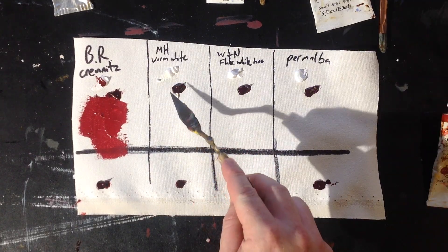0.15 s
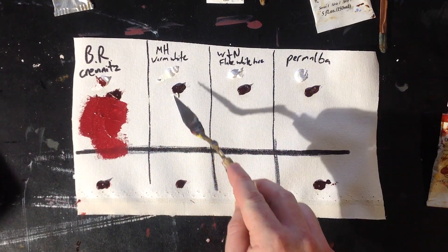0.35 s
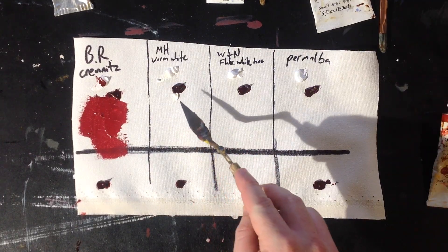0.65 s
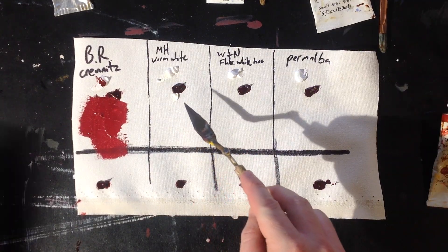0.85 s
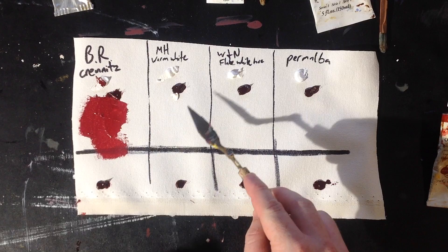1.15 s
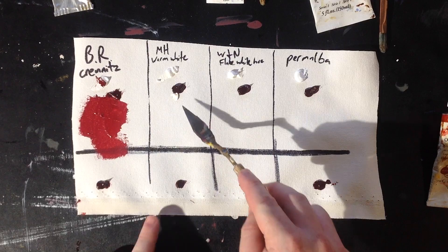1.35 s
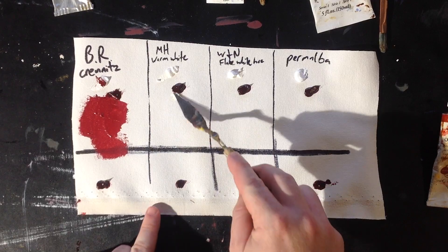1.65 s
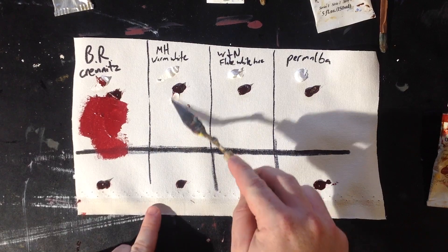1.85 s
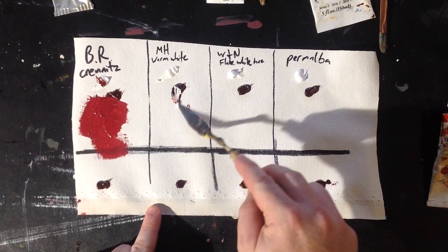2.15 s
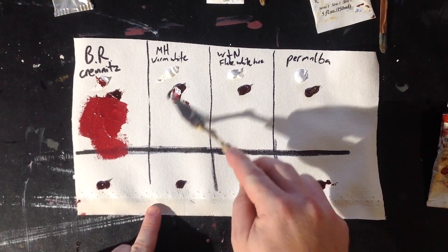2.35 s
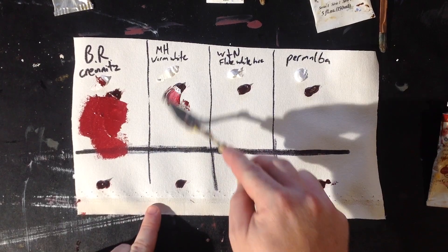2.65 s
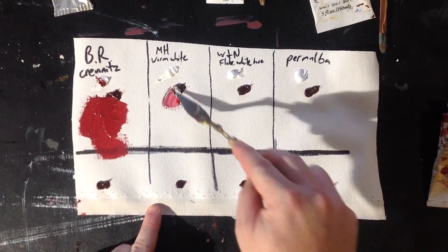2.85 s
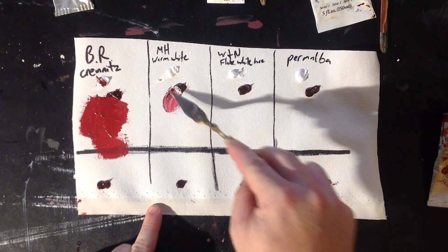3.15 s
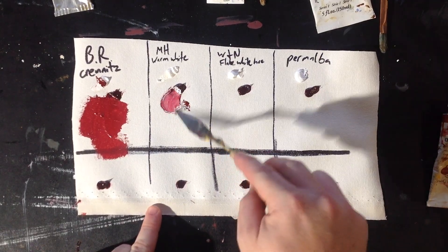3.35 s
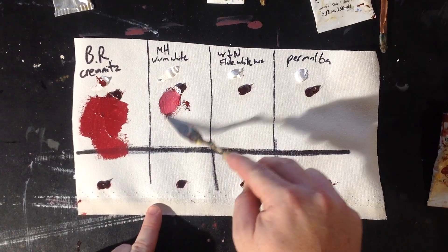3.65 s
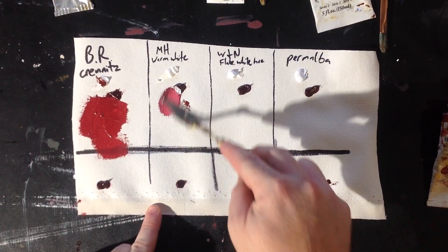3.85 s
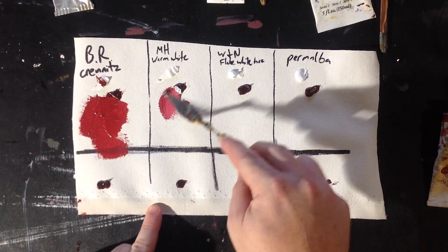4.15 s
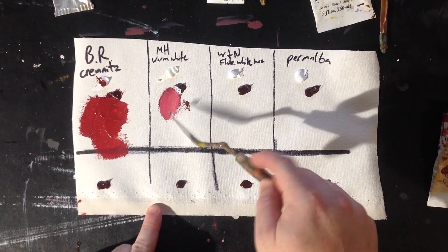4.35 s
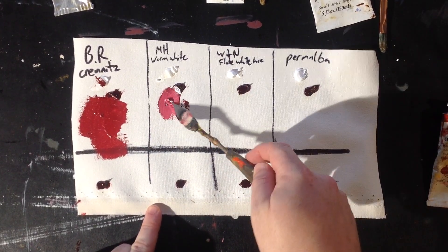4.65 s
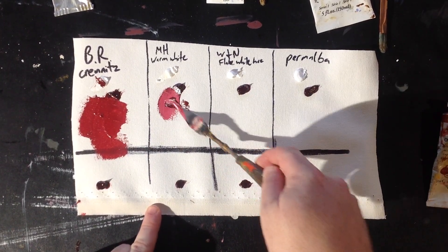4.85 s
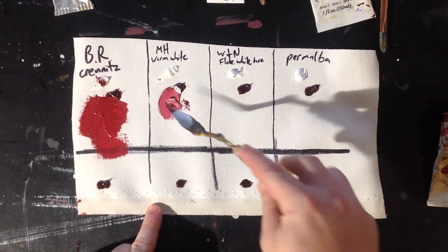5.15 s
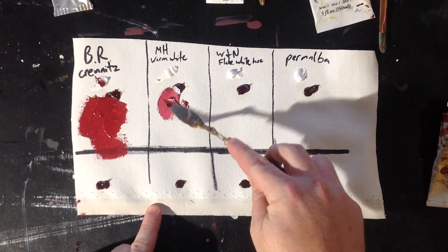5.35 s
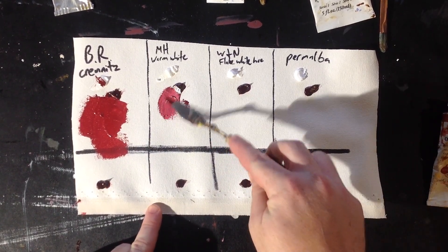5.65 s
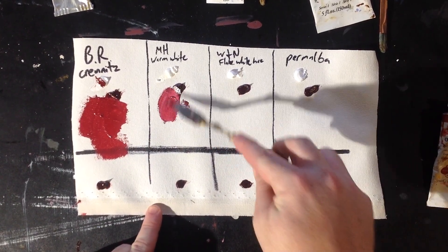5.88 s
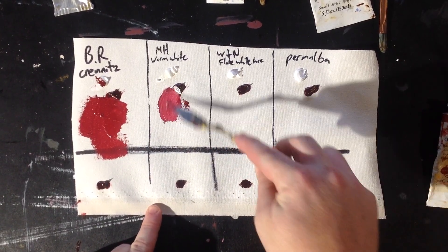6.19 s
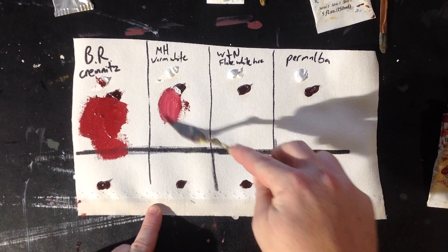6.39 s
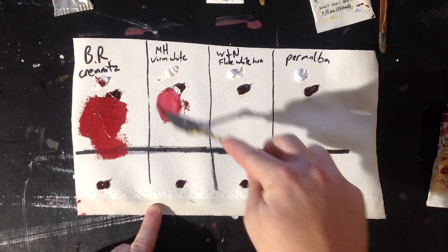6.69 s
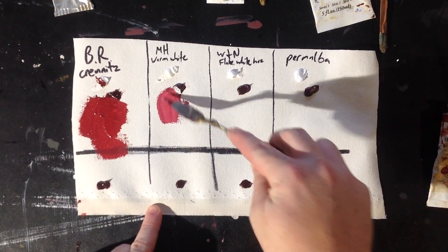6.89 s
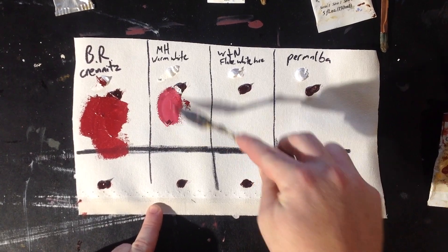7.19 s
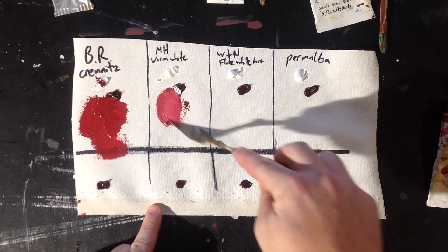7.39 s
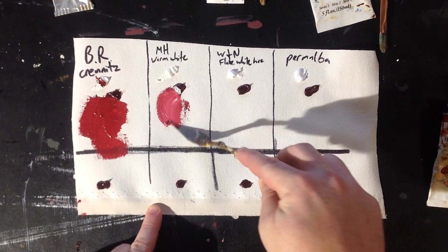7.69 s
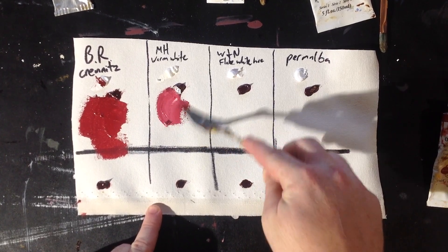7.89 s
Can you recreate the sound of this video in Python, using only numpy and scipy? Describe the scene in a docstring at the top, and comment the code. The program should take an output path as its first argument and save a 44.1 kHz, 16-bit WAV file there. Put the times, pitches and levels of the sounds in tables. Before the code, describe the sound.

Quick dry scrapes and springy clicks of a thin metal blade spreading paint on a sheet, with a low distant motor drone behind.

```python
"""In a small room, a palette knife mixes oil paint on a sheet of canvas paper that lies on a table.
Strokes come in runs of about three a second: random clicks, shaped by resonances, rasp as the blade bears down,
then hiss as its edge cuts through the paint; a small flick follows. Short bursts of bounces make separate ticks.
Soft rubs of the sheet and, near the start, faint gliding squeaks (sine tones) join in.
Behind it are a wavering machine hum, a far motor and a drone that drift in pitch, and low and airy noise."""
import sys
import numpy as np
from scipy import signal
from scipy.fft import rfft, irfft, next_fast_len
from scipy.io import wavfile

SR = 44100
rng = np.random.default_rng(int(sys.argv[2]) if len(sys.argv) > 2 else 0)


def generate_wav(sig):
    """Save sig (samples, or channels by samples) to the path in sys.argv[1] as 16-bit PCM at SR."""
    pcm = np.round(np.clip(np.atleast_2d(sig).T, -1, 1) * 32767).astype(np.int16)
    wavfile.write(sys.argv[1], SR, pcm)


N = 353902
T = np.arange(N) / SR  # time [s]


def amp(db):
    """Turns decibels into a plain gain."""
    return 10 ** (np.asarray(db) / 20)


def evened(x):
    """Scales a sound to an rms of 1."""
    return x / np.sqrt(np.mean(x ** 2) + 1e-20)


def read(points, hz):
    """Reads a spectrum table, joined by straight lines on a log-frequency axis."""
    table_hz, value = np.transpose(points)
    return np.interp(np.log(hz + 1), np.log(table_hz + 1), value)


def add(mix, s, sound):
    """Adds a sound to the mix at time s, cut off where the mix ends."""
    part = mix[max(round(s * SR), 0):][:len(sound)]
    part += sound[:len(part)]


def coloured(x, points):
    """Filters x by the spectrum in a table."""
    size = next_fast_len(len(x))
    gain = amp(read(points, np.fft.rfftfreq(size, 1 / SR)))
    return irfft(rfft(x, size) * gain, size)[:len(x)]


def wander(per_s):
    """A random curve of rms 1: straight lines between per_s random points a second."""
    knots = rng.standard_normal(N // 20)
    return evened(np.interp(T * per_s, np.arange(len(knots)), knots))


def ring(x, modes):
    """Sums the resonances that x sets ringing; a wider one dies away sooner."""
    return sum(amp(db) * signal.lfilter(*signal.iirpeak(hz, hz / width, SR), x) for hz, width, db in modes)


def resonate(x, hz, width, lag=0):
    """A resonance of gain 1 whose centre may move; lag delays its phase [radians]."""
    turn = np.exp(2j * np.pi * np.cumsum(hz * np.ones(len(x))) / SR)
    r = np.exp(-np.pi * width / SR)
    # shift the centre down to 0 Hz, smooth there, then shift it back
    smooth = signal.lfilter([1 - r], [1, -r], x / turn + 1e-18)
    return 2 * (np.exp(-1j * lag) * turn * smooth).real


def grains(per_s, spread_db):
    """Random clicks of uneven size, as an edge makes tripping over the tooth of the sheet."""
    size = amp(spread_db * np.minimum(rng.exponential(1, N), 4))
    sign = rng.choice([-1, 1], N)
    return evened(size * sign * (rng.random(N) < per_s / SR))


# how long the room takes to fade by 60 dB: (frequency [Hz], time [s])
ROOM_DECAY = [(300, 0.4), (1600, 0.4), (5000, 0.49), (14000, 0.11)]
# near surfaces that answer first: (delay [s], level [dB])
ECHOES = [(.0023, -24), (.0047, -22), (0.0139, -11)]


def room(x, wet_db=-14):
    """Adds echoes off near surfaces and a short tail of random echoes that fades at its own rate per pitch."""
    size = SR // 2
    present = (rng.random(size) < 3000 / SR) * (np.arange(size) > .005 * SR)
    taps = rng.choice([-1., 1.], size) * present
    hz, t, z = signal.stft(taps, SR, nperseg=256)
    fade = amp(-60 * t / read(ROOM_DECAY, hz)[:, None])
    tail = signal.istft(z * fade, SR, nperseg=256)[1]
    tail = amp(wet_db) * tail / np.linalg.norm(tail)
    for delay_s, db in ECHOES:
        add(tail, delay_s, amp([db]))
    return x + signal.fftconvolve(x, tail)[:N]


# lines of the machine's hum, before swell and waver: (frequency [Hz], rms level [dB])
HUM = [(258.8, -55.5), (296, -71), (517.6, -84.5), (980, -95.5)]
# the hum swells and fades: (time [s], gain [dB])
HUM_SWELL = [(0, 1), (3, 1.5), (5, 0.5), (7, -5.5), (8, -7)]
# the far motor, before its waver: (time [s], frequency [Hz], rms level [dB])
MOTOR = [(0, 177, -63), (.5, 176, -69.5), (1.3, 175, -69), (1.5, 169, -60.5), (1.74, 164, -52.5),
         (2.1, 160, -64), (2.95, 159, -68.5), (3.15, 160, -58.5), (3.84, 161.7, -57.5), (4.36, 167, -65.5),
         (4.57, 164, -48.5), (5.1, 157.7, -66), (5.85, 159.8, -63.5), (6.43, 163.6, -50.5),
         (6.8, 168.4, -55.5), (7.0, 171, -78), (7.12, 168.5, -59), (7.39, 163.4, -49), (7.66, 157.3, -63.5),
         (8.02, 151, -51)]
# a faint drone, before its waver: (time [s], frequency [Hz], rms level [dB])
DRONE = [(0, 202.3, -78), (1.2, 201, -76), (2, 198.2, -66.5), (3, 203, -71), (3.999, 210.5, -69),
         (5, 208.8, -70.5), (6, 208.3, -66.5), (6.6, 217, -90), (8, 206, -75)]
# colour of the machines' low murmur: (frequency [Hz], relative level per Hz [dB])
RUMBLE_COLOUR = [(20, -28), (45, -35), (70, -18.5), (100, -11.5), (135, 1), (190, 4.5), (240, -1), (330, 0),
                 (400, -5), (480, -14.5), (600, -40), (1500, -54)]
# colour of the room's noise: (frequency [Hz], relative level per Hz [dB])
AIR_COLOUR = [(260, -33), (450, -14), (521, -4), (553, -8), (897, -10), (1220, -12.5), (1350, -10.5),
              (1480, -12.5), (2070, -18), (15000, -21)]


def machines(rumble_db=-61, air_db=-63.5, waver_db=1.44, drift_hz=0.5, motor_db=0, motor_waver_db=0.97,
             rumble_follows=0.035, rumble_waver_db=1.95):
    """Turning machines give wavering sine tones, two of them gliding, over low rumble and airy noise."""
    drift = drift_hz * wander(3) / HUM[0][0]  # all lines drift in proportion to the first
    hum = sum(amp(db) * np.sin(2 * np.pi * np.cumsum(hz * (1 + drift)) / SR) for hz, db in HUM)
    swell_db = np.interp(T, *np.transpose(HUM_SWELL))
    tones = hum * amp(swell_db + waver_db * wander(12))
    for rows in (MOTOR, DRONE):
        s, hz, db = np.transpose(rows)
        level = amp(np.interp(T, s, db) + motor_db + motor_waver_db * wander(13))
        tones = tones + level * np.sin(2 * np.pi * np.cumsum(np.interp(T, s, hz)) / SR)
    # the rumble follows the hum's swell only slightly
    rumble_level = amp(rumble_db + rumble_follows * swell_db + rumble_waver_db * wander(5))
    rumble = rumble_level * evened(coloured(rng.standard_normal(N), RUMBLE_COLOUR))
    air = amp(air_db) * evened(coloured(rng.standard_normal(N), AIR_COLOUR))
    return np.sqrt(2) * tones + rumble + air  # sqrt(2) makes the tone levels rms


# the sheet slides softly on the table: (time [s], length [s], peak level [dB])
SLIDES = [(0.503, 0.17, -65), (0.862, 0.037, -56.5), (3.412, 0.089, -54), (7.869, 0.02, -48.5)]
# colour of a slide: (frequency [Hz], relative level [dB])
SLIDE_COLOUR = [(200, 7), (700, -5), (2000, -5.5), (3500, -7), (6000, -12), (15000, -33)]


def slides():
    """The sheet rubs on the table: dull grains that swell quickly and die away."""
    level = sum(amp(db) * np.interp(T, [s, s + length / 5, s + length], [0, 1, 0])
                for s, length, db in SLIDES)
    return level * evened(coloured(grains(per_s=2900, spread_db=-1.5), SLIDE_COLOUR))


# faint squeaks: (time [s], length [s], first frequency [Hz], last frequency [Hz], level [dB])
SQUEAKS = [(.11, .12, 2850, 3270, -77), (.13, .035, 8550, 9600, -75), (.15, .035, 11000, 11150, -76),
           (.18, .052, 9350, 8720, -72), (.245, .055, 11700, 11620, -75), (0.308, 0.054, 9250, 8720, -76),
           (.355, .06, 8750, 9050, -76)]


def squeaks():
    """Thin sine tones that glide in pitch while they swell and fade."""
    out = np.zeros(N)
    for s, length, from_hz, to_hz, db in SQUEAKS:
        u = np.arange(0, length, 1 / SR) / length  # progress from 0 to 1
        hz = from_hz + (to_hz - from_hz) * u
        swell = np.sqrt(2 * np.sin(np.pi * u))
        add(out, s, amp(db) * swell * np.sin(2 * np.pi * np.cumsum(hz) / SR))
    return out


# the blade touches down or snags:
# (time [s], relative level [dB], relative level of the bright snap [dB], bounce rate [Hz])
TICKS = [(.5015, -39.5, -2, 3070), (0.6414, -40, 7, 2470), (0.876, -44, -4, 2730),
         (1.8743, -44.5, -20, 1780), (2.232, -37.5, -6, 1800), (2.6538, -45.5, -14, 1830),
         (3.2464, -36.5, -18, 1835), (3.2836, -34, -16, 1880), (3.5472, -34, -8, 1720),
         (3.5912, -37, -22, 1840), (3.8475, -36.5, -20, 1790), (3.9199, -45, 20, 1800),
         (4.1912, -37.5, -19, 1560), (4.1998, -37, -19, 1660), (4.6672, -43, -4, 1680),
         (4.675, -42, 5, 1720), (4.7, -40.5, -15, 1710), (5.017, -31.5, -14, 1710),
         (5.4013, -43.5, -21, 1570), (5.451, -45, -15, 1750), (5.464, -38, 10, 1670),
         (5.5119, -34, -8, 1700), (5.697, -38, 0.5, 1590), (5.754, -35, -3, 1810),
         (6.0076, -40.5, -10, 1650), (6.1172, -30, 8, 1600), (6.33, -37, -20, 1650),
         (6.652, -41, -19, 1630), (6.9889, -38.5, -20, 1770), (7.0466, -36.5, 13.5, 1580),
         (7.191, -40, -15, 2030), (7.3235, -39, -17, 1745), (7.625, -42, -14, 1900), (7.665, -30, 0, 1800),
         (7.8726, -32, -9, 1750)]
# colour of one impact of the blade on the sheet: (frequency [Hz], relative level [dB])
IMPACT_COLOUR = [(200, -24), (800, -12), (1400, 1), (2200, 1), (3500, -6.5), (4500, -16), (6500, -14.5),
                 (15000, -18.5)]
# what blade and board ring with, in ticks and rasp: (frequency [Hz], width [Hz], relative level [dB])
BLADE_MODES = [(980, 100, -55), (1350, 220, -8), (1595, 230, 9.5), (1824, 140, 6.5), (2000, 150, -12),
               (2740, 190, -22), (3400, 550, -15.5), (4080, 620, -24), (5500, 500, -24), (6460, 690, -11),
               (8100, 1000, -11.5)]
# colour of the edge's hiss and of a tick's snap: (frequency [Hz], relative level [dB])
HISS_COLOUR = [(200, -40), (500, -26), (1000, -26), (2500, -30), (3800, -25), (4600, -10), (6000, -18),
               (7500, -14.5), (8700, -8.5), (10000, -3.5), (12000, -2.5), (13500, -4), (15000, -8),
               (17000, -3)]


def ticks(level_db=-2.0, snap_db=-2, jitter=0.13, bounce_loss_db=-3, board_db=-4, snap_s=.0015,
          usual_hz=1720, count=16):
    """The springy blade bounces, ever weaker; the rate of the bounces is the pitch of the tick."""
    out, t = np.zeros(N), np.arange(1200) / SR
    for s, db, bright_db, hz in TICKS:
        bounces = np.cumsum(abs(1 + jitter * rng.standard_normal(count))) / hz  # times [s]
        blow = np.zeros(len(t))
        for k, at in enumerate(bounces):
            add(blow, at, amp([k * bounce_loss_db]))
        # a stiffer, faster contact moves the whole colour of the tick up in pitch
        stiff = hz / usual_hz
        impact = coloured(blow, [(f * stiff, d) for f, d in IMPACT_COLOUR])
        board = ring(blow, [(f * stiff, w, d) for f, w, d in BLADE_MODES])
        knock = impact + amp(board_db) * board
        snap = coloured(rng.standard_normal(len(t)), HISS_COLOUR) * np.exp(-t / snap_s)
        tick = knock / abs(knock).max() + amp(bright_db + snap_db) * snap / abs(snap).max()
        add(out, s, amp(db + level_db) * tick)
    return out


# the hand bears down quickly and lets go more slowly; the hiss stops sooner than the rasp
ATTACK_DB_PER_S, RASP_FADE_DB_PER_S, HISS_FADE_DB_PER_S = 1150, 392, 466
PAINT_DB = -10.5  # wet paint muffles the hiss until the edge has cut through
# the flick out of the paint: delay after the hand lets go, half its length, level relative to the rasp
FLICK_AFTER_S, FLICK_S, FLICK_DB = 0.06, 0.02, -8
# the light glide around each stroke: lead-in and run-out, highest levels, level relative to a faint stroke
GLIDE_BEFORE_S, GLIDE_AFTER_S = 0.077, 0.14
GLIDE_RASP_DB, GLIDE_HISS_DB, GLIDE_UNDER_DB = -65.5, -66.5, -6
# strokes of the knife: (time it bears down [s], length [s], time to cut through the paint [s],
# rasp level [dB], hiss level [dB], swell over the stroke [dB], pitch of the blade's ring [Hz],
# then relative levels: ring [dB], sheet's rustle [dB], table's thump [dB], buzz of the flat [dB])
STROKES = [(.011, 0.018, .015, -59, -64, -7, 10700, -7, 4.5, -10, -12),
           (2.159, .025, 0.0037, -68, -62, -5, 11000, -5, 1, -9, -20),
           (2.42, 0.031, 0.01, -55, -46.5, 1.5, 11000, .5, -2, -4, -27),
           (2.691, 0.055, 0.02, -52, -42.5, 1, 11000, 1, -2.5, -1, -26),
           (3.003, .052, 0.026, -60, -50, -7, 13000, -19, -7, 6, -22),
           (3.296, 0.086, .035, -63, -57.5, -10, 15100, 2, -8, 9, -21),
           (3.592, .067, 0.04, -54.5, -49.5, -1, 15000, 0, -6, 5.5, -20),
           (3.908, 0.073, 0.034, -55.5, -50, 1, 15000, 7, -6, 0, -18),
           (4.244, 0.074, 0.036, -57, -56.5, -5, 15100, 2, -5, -10, -18),
           (4.76, 0.27, .018, -72, -72.5, 8, 13600, -6, 7, 0, -20),
           (5.01, 0.013, .014, -53.5, -56.5, 4, 13600, -9, 4, 9.5, -16),
           (5.452, 0.053, .004, -57.5, -50.5, 0, 11000, 2.5, 2.5, -10, -22),
           (5.749, 0.055, .008, -52, -42.5, -7, 11500, 2.5, 1, -20, -25),
           (6.052, 0.075, 0.0043, -50, -43, -2, 11600, -2, -2, 2, -17),
           (6.373, 0.072, 0.016, -50.5, -44, 3.5, 12300, -9, -1.5, 7.5, -8),
           (6.7, 0.083, 0.043, -55, -49, 9.5, 12400, -2, 1, 8.5, -9),
           (7.043, 0.084, 0.018, -53.5, -47, -0.5, 12620, -2, -4.5, 6, -10.5),
           (7.362, .083, 0.072, -54.5, -47.5, -4.5, 15000, 7, -7, 4, -15),
           (7.661, 0.075, 0.048, -50.5, -43, -2, 13900, 1, -5.5, 2, -15),
           (7.875, .017, .005, -59, -75, -3, 13600, -5, 3, 2, -14),
           (7.956, 0.039, 0.0086, -47, -43, 1.5, 13500, 0, 1, 9.5, -1.5)]


def handling():
    """How hard the blade bears down, and how much its edge meets the dry tooth, as two gains over time."""
    press, edge = np.zeros((2, N))  # powers, until the square root at the end
    for start, length, cut_s, rasp_db, hiss_db, swell_db, *_ in STROKES:
        t = T - start
        after = np.maximum(t - length, 0)
        force_db = ATTACK_DB_PER_S * np.minimum(t, 0) + swell_db * (np.clip(t / length, 0, 1) - .5)
        glide = np.interp(t, [-GLIDE_BEFORE_S, 0, length, length + GLIDE_AFTER_S], [0, 1, 1, 0])
        flick_shape = np.interp(t - length - FLICK_AFTER_S, [-FLICK_S, 0, FLICK_S], [0, 1, 0])
        flick = amp(rasp_db + FLICK_DB) * flick_shape
        on = glide > 0
        paint_db = PAINT_DB * np.clip(1 - t[on] / cut_s, 0, 1)
        rasp = amp(rasp_db + force_db[on] - RASP_FADE_DB_PER_S * after[on])
        hiss = amp(hiss_db + force_db[on] + paint_db - HISS_FADE_DB_PER_S * after[on])
        # even the faintest stroke stands out from its glide
        glide_rasp = amp(min(GLIDE_RASP_DB, rasp_db + GLIDE_UNDER_DB)) * glide[on]
        glide_hiss = amp(min(GLIDE_HISS_DB, hiss_db + GLIDE_UNDER_DB)) * glide[on]
        press[on] += rasp ** 2 + glide_rasp ** 2 + flick[on] ** 2
        edge[on] += hiss ** 2 + glide_hiss ** 2
    return np.sqrt(press), np.sqrt(edge)


# the flat of the blade buzzes on the sheet: (frequency [Hz], width [Hz], relative level [dB])
BUZZ_MODES = [(2490, 950, 4), (3100, 1400, -7)]
# resonances of the sheet: (frequency [Hz], width [Hz], relative level [dB])
SHEET_MODES = [(1054, 440, -2), (2420, 1100, -9.5), (3340, 240, -11), (4280, 280, 1.5), (5200, 600, -5.5),
               (6500, 370, -11)]
# the table's low modes: (frequency [Hz], width [Hz], relative level [dB])
TABLE_MODES = [(355, 67, -1.5), (593, 150, -7)]


def scrapes(rasp_db=0, hiss_db=0, sheet_db=-9, thump_db=-19, firm_db=-44, growth=0.95, slip_db=2.0,
            slips_per_s=480, ring_width_hz=1100, own_slip_db=2, tremor_db=1.0, tremors_per_s=90):
    """Unevenly bunched grains shake blade, sheet and table into a rasp, and hiss at the edge."""
    press, edge = np.array(handling()) * amp(tremor_db * wander(tremors_per_s))
    start, length, *columns = np.transpose(STROKES)
    # these columns slide from the middle of one stroke to the middle of the next
    middle = start + length / 2
    ring_hz, ring_db, rustle_db, weight_db, buzz_db = (np.interp(T, middle, c) for c in columns[4:])
    slips = amp(slip_db * wander(slips_per_s))
    coarse = evened(slips * grains(per_s=4500, spread_db=2.0))
    own_slips = slips * amp(own_slip_db * wander(900))
    fine = evened(coarse + own_slips * grains(per_s=6000, spread_db=5.0))
    buzz = ring(slips * grains(per_s=4500, spread_db=0.5), BUZZ_MODES)
    buzz = evened(ring(buzz, BUZZ_MODES))  # the second pass makes the peaks sharper
    rasp = evened(ring(coarse, BLADE_MODES)) + amp(buzz_db) * buzz
    # the blade's ring lifts the hiss below its pitch and weakens it just above
    blade_ring = resonate(fine, ring_hz, ring_width_hz, lag=np.pi / 2)
    hiss = evened(coloured(fine + amp(ring_db) * blade_ring, HISS_COLOUR))
    # sheet and table follow the edge's level, growing slightly less than in proportion
    shake = amp(firm_db) * (edge / amp(firm_db)) ** growth
    drag = slips * grains(per_s=4000, spread_db=1.0)
    rustle = amp(sheet_db + rustle_db) * evened(ring(drag, SHEET_MODES))
    thump = amp(thump_db + weight_db) * evened(ring(drag, TABLE_MODES))
    return amp(rasp_db) * press * rasp + amp(hiss_db) * edge * hiss + shake * (rustle + thump)


def scene(low_cut_hz=220):
    """The knife in the room, over the machines; so small a thing gives off little bass."""
    knife = slides() + squeaks() + ticks() + scrapes()
    low_cut = signal.butter(2, low_cut_hz, "high", fs=SR, output="sos")
    return (machines() + room(signal.sosfilt(low_cut, knife)))[None]


def record(dry, edge_hz=15450):
    """Limits the band: a steep filter takes away the treble above edge_hz."""
    low_pass = signal.firwin(511, edge_hz, window=("kaiser", 9), fs=SR)
    return signal.oaconvolve(dry, low_pass[None], "same")


dry = scene()
out = record(dry)
generate_wav(out)
```